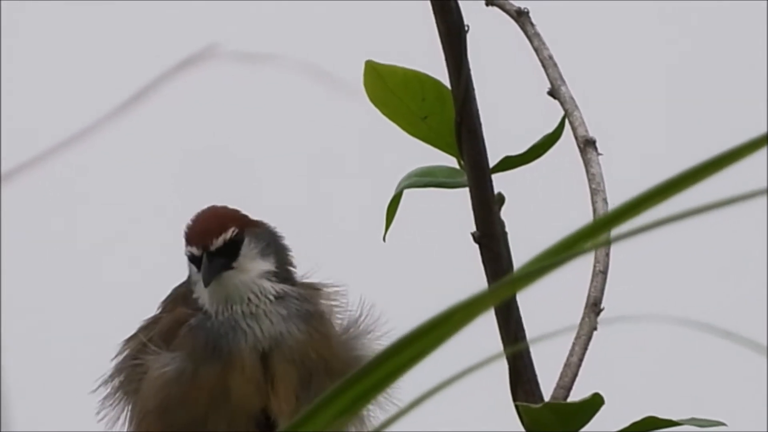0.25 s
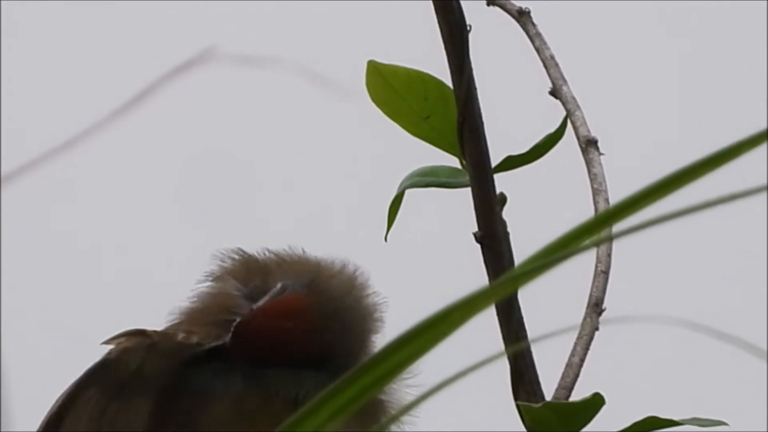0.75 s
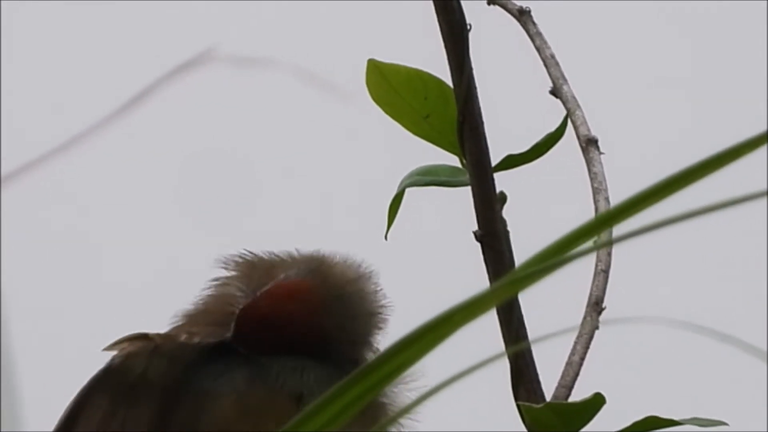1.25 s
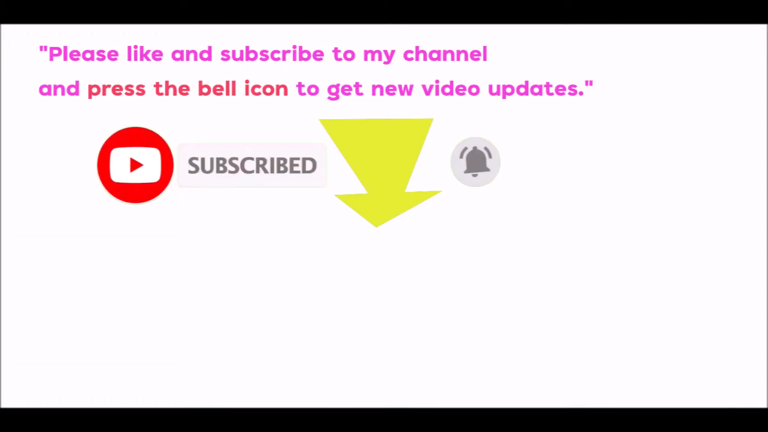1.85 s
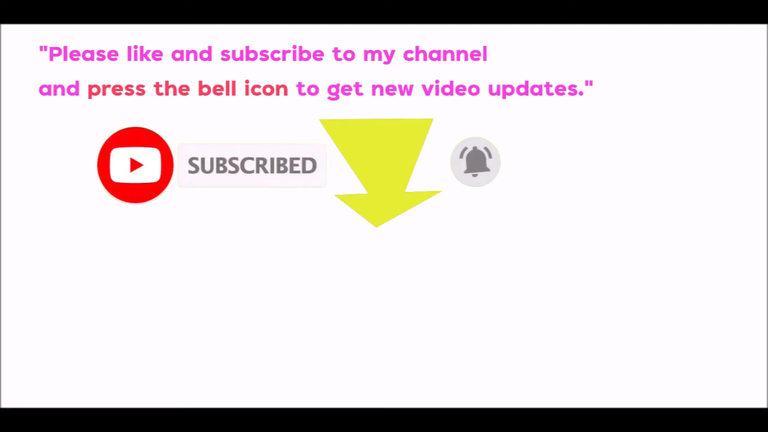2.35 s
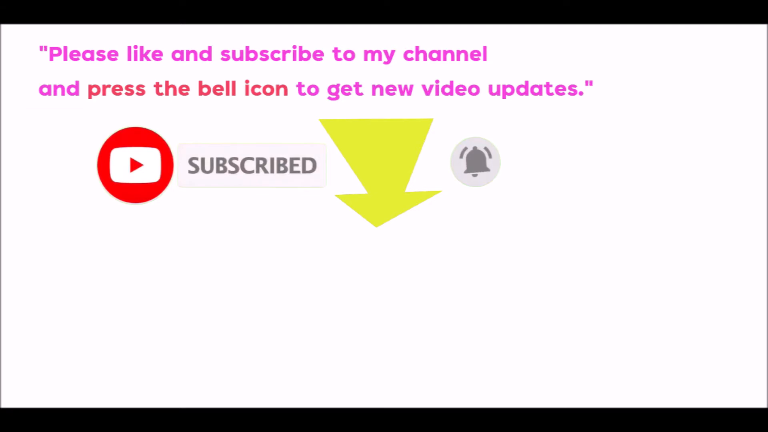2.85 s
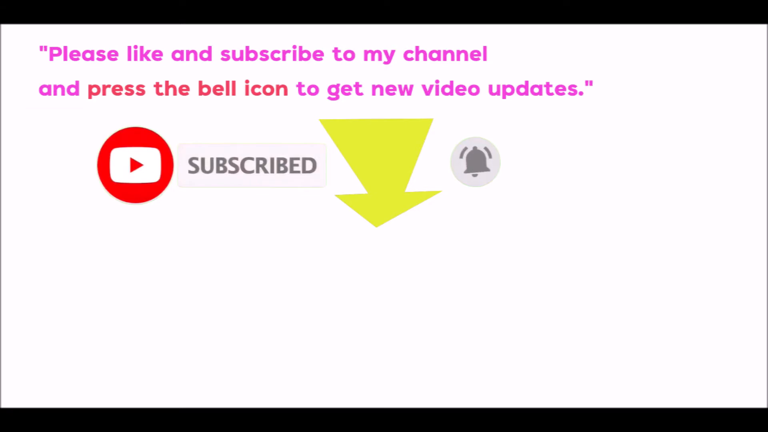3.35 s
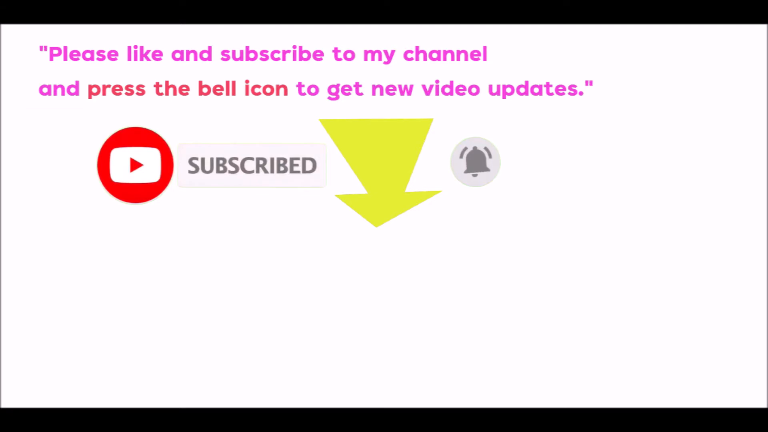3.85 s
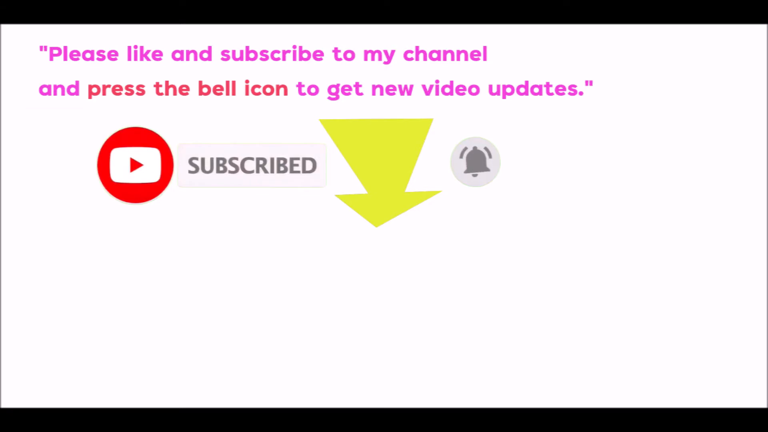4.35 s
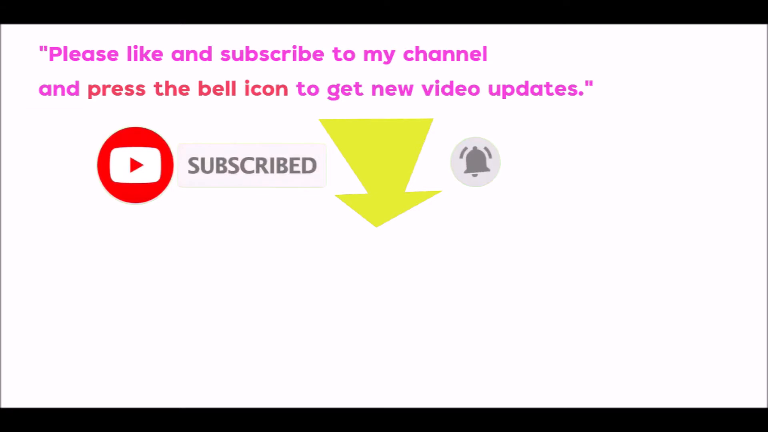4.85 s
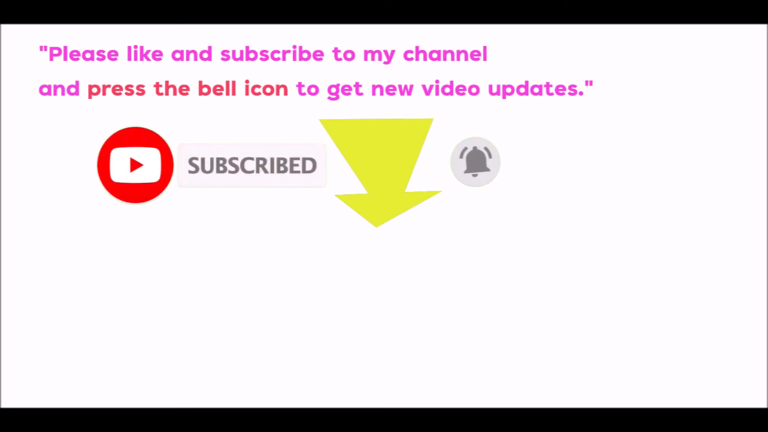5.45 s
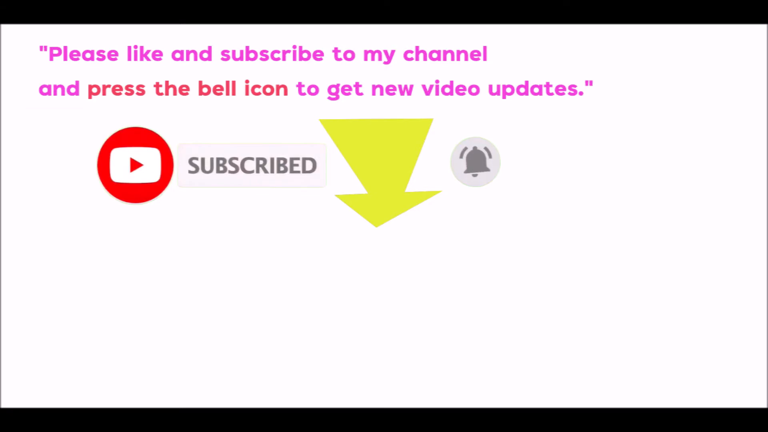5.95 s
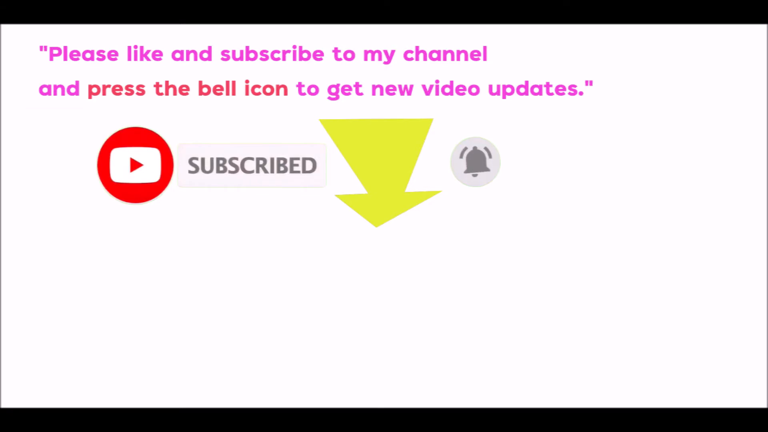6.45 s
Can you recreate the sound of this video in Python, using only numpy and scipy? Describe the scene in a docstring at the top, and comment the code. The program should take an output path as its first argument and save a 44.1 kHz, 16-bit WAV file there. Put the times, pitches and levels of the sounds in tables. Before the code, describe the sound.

Outdoors, steady high insect drone with low hum and thin distant twittering. A split-second shriek with a thin ping cuts the hum and near drone. On the left, a bird amid leaves rasps nasally, rattles off about a dozen harsh notes that slow and fade, then whistles sharply with short scattered echoes. Far calls, pulsing insects and faint low bumps continue; the right holds only hiss.

```python
"""A near insect band and a low hum fill both sides, then stop at a short overloaded zap; hiss stays right.
On the left, insects drone and pulse and far birds twitter throughout: noise bands, thin tones, bent sines.
After the zap a babbler in a thicket, also left, gives a nasal rasp, a fast harsh chatter and sharp whistles.
Rasp and chatter are membrane harmonics and turbulent air shaped by a throat; the whistles are near sines."""
import sys
import numpy as np
from scipy import signal
from scipy.fft import rfft, irfft
from scipy.io import wavfile
from scipy.ndimage import map_coordinates

SR = 44100
rng = np.random.default_rng(int(sys.argv[2]) if len(sys.argv) > 2 else 0)


def int16_out(signal):
    """Quantize to a 16-bit WAV file."""
    q = np.round(np.clip(np.atleast_2d(signal).T, -1, 1) * 32767)
    wavfile.write(sys.argv[1], SR, q.astype(np.int16))


N = 295911
TIME = np.arange(N) / SR
FREQS = np.arange(N // 2 + 1) * SR / N
ZAP_START_S, ZAP_END_S = 1.5173, 1.5317
ZAP_MIDDLE_S = (ZAP_START_S + ZAP_END_S) / 2
CUTOFF_HZ = 16100


def from_db(db):
    """Decibels to gain."""
    return 10 ** (np.asarray(db) / 20)


def rms_one(x):
    """Scale to unit power."""
    return x / np.sqrt(np.mean(x ** 2) + 1e-20)


def in_time(rows, t=TIME):
    """Interpolate each column of a curve at times t; the first column is time."""
    s, *columns = np.transpose(rows)
    return [np.interp(t, s, c) for c in columns]


def add(out, s, sound):
    """Mix a sound into out at time s."""
    start = max(int(s * SR), 0)
    out[start:start + len(sound)] += sound[:max(N - start, 0)]


def noise(spectrum):
    """Steady noise with the given power per Hz, interpolated over log frequency."""
    hz, db = np.transpose(spectrum)
    gain = from_db(np.interp(np.log(FREQS + 1), np.log(hz), db))
    return irfft(rfft(rng.standard_normal(N)) * gain, N) * np.sqrt(SR / 2)


def band(hz, width):
    """Noise in one bell-shaped band, rms 1; width in Hz between the -3 dB points."""
    bell = 2 ** (-2 * ((FREQS - hz) / width) ** 2)
    return rms_one(irfft(rfft(rng.standard_normal(N)) * bell, N))


def wander(rate_hz, size):
    """Random curve around 0: normal draws of spread 1 at rate_hz, joined by lines."""
    knots = np.arange(size) * rate_hz / SR
    return map_coordinates(rng.standard_normal(size), [knots], order=1)


def turn(hz):
    """Phase of an oscillator that follows a pitch."""
    return 2 * np.pi * np.cumsum(hz) / SR


def swell(u, edge):
    """Envelope over u = 0..1 with rounded ends."""
    return np.sin(np.pi / 2 * np.clip(np.minimum(u, 1 - u) / edge, 0, 1)) ** 2


def bout(start_s, end_s, edge_s):
    """Envelope that rises from start, holds and falls to end."""
    return np.sin(np.pi / 2 * np.clip(np.minimum(TIME - start_s, end_s - TIME) / edge_s, 0, 1)) ** 2


def pulse(middle_s, spread_s):
    """Bell-shaped envelope in time, peak 1."""
    return np.exp(-.5 * ((TIME - middle_s) / spread_s) ** 2)


def air():
    """Outdoor rush with a far drone; a faint rumble grows after the zap, with soft bumps."""
    # open-air noise: hz, level_db_per_hz
    air_spectrum = [(20, -102), (40, -89), (70, -81), (200, -78), (600, -75.5), (1150, -74.5),
                    (1600, -80.5), (2400, -83), (3600, -82), (5500, -104), (7000, -92), (10000, -94.5),
                    (13000, -93), (16000, -100)]
    # far steady drone: pitch_hz, rms_db
    drone_tones = [(130, -62.5), (262, -61), (657, -59), (920.5, -75)]
    # soft low bumps: middle_s, level_db
    bump_events = [(2.21, -48), (2.83, -47), (3.58, -43.5), (3.76, -49), (4.52, -45.5), (5.05, -51),
                   (5.32, -53), (5.79, -47)]
    drone = sum(np.sqrt(2) * from_db(db) * np.sin(turn(hz + 2 * wander(14, N))) for hz, db in drone_tones)
    bumps = sum(from_db(db) * pulse(s, 0.023) for s, db in bump_events)
    rumble_db = np.interp(TIME, [ZAP_END_S, 3.5, 5], [-76, -68, -61])
    rumble = from_db(rumble_db) * band(56, width=39)
    return noise(air_spectrum) + drone + rumble + bumps * band(115, width=82)


def hiss():
    """Steady noise for the right side."""
    # hz, level_db_per_hz
    hiss_spectrum = [(20, -120), (100, -110), (400, -97), (1500, -94), (6000, -93), (16000, -94)]
    return noise(hiss_spectrum)


def near_drone(alike=.85, hum_hz=197):
    """Near insect bands, a wavering low hum and a dull wash, on both sides until the zap ends."""
    # insect bands before the side trim: centre_hz, width_hz, level_db
    near_bands = [(4780, 300, -38.9), (4570, 400, -47.5), (6690, 590, -48.5), (4800, 2100, -54)]
    # common gain of the hum parts: time_s, gain_db
    hum_curve = [(0.0, -53), (0.024, -51.5), (0.48, -49.5), (0.942, -59.5), (1.05, -51), (1.448, -53),
                 (1.49, -63)]
    # wash: hz, level_db_per_hz
    wash_spectrum = [(20, -110), (150, -86.5), (400, -93.5), (700, -85.5), (1000, -87), (3500, -94.5),
                     (8000, -98), (16000, -112)]
    common, left, right = [sum(from_db(db) * band(hz, width) for hz, width, db in near_bands)
                           for _ in range(3)]
    # alike: share of power common to both sides
    sides = np.sqrt(alike) * common + np.sqrt(1 - alike) * np.array([left, right])
    sides = sides * (1 + 0.1 * wander(121, N))
    side_trim_db = [[-2], [1]]
    hum = 1.3 * np.sin(turn(hum_hz + 2 * wander(26.0, N)))
    hum += 0.45 * band(202, width=52)
    hum += 0.33 * np.sin(turn(657 + 2 * wander(13.5, N)))
    hum *= from_db(in_time(hum_curve)[0])
    return (sides * from_db(side_trim_db) + hum + noise(wash_spectrum)) * (TIME < ZAP_END_S)


def zap(shriek_hz=4850, drive_db=2, crackle_db=-8, ping_hz=15740, ping_db=1):
    """A very short, crackling shriek that ends in a thin ping; the right side gets only a blip."""
    # decaying ring after the zap: pitch_hz, gain_db
    ring_tones = [(560, -15.5), (780, -18), (3130, -12), (9500, -25)]
    tone = np.sin(turn(shriek_hz * (1 + .07 * wander(2000, N))))
    burst = from_db(drive_db) * tone + from_db(crackle_db) * band(6200, width=1800)
    burst += 0.24 * band(3450, width=510) + 0.41 * band(12600, width=7400)
    gate = (TIME > ZAP_START_S) * (TIME < ZAP_END_S)
    fringe = pulse(ZAP_MIDDLE_S, 0.0066)
    burst *= gate + from_db(-21) * fringe
    age_s = np.clip(TIME - ZAP_END_S - .0007, 0, 1)
    rise = 1 - np.exp(-age_s / 0.00039)
    ping_decay = from_db(ping_db) * np.exp(-age_s / 0.0053) + .22 * np.exp(-age_s / 0.013)
    ping = rise * ping_decay * np.sin(2 * np.pi * ping_hz * TIME)
    ring = sum(from_db(db) * np.sin(2 * np.pi * hz * age_s) for hz, db in ring_tones)
    ring = rise * np.exp(-age_s / 0.0023) * ring
    knock = from_db(-25.5) * pulse(ZAP_MIDDLE_S, 0.0042) * band(610, width=410)
    blip_level = .65 * pulse(ZAP_MIDDLE_S, .0009) + .08 * fringe
    blip = blip_level * (tone + .2 * band(4400, width=3500))
    return np.array([burst + ping + ring + knock, blip])


def whine(hz, waver_hz=18, flicker=0.45):
    """A thin insect tone that trembles in pitch and level."""
    return (1 + flicker * wander(40, N)) * np.sin(turn(hz + waver_hz * wander(200, N)))


def insects(pulse_s=0.03, edge_s=.22, ticks_per_s=128, tick_depth=.55, tick_db=-51, pulse_gap_s=.128):
    """A steady far chorus with fine high ticking, thin whines that come and go, and a high pulsing singer."""
    # far noise bands: centre_hz, width_hz, level_db
    chorus_bands = [(4700, 650, -43), (5900, 890, -46), (7650, 1060, -49), (9110, 630, -53)]
    # unbroken faint tones: pitch_hz, level_db
    steady_tones = [(5479, -59), (5850, -54), (6435, -52.5)]
    # whines, one swell each: start_s, end_s, pitch_hz, level_db
    whine_bouts = [(-.2, 1.0, 5900, -46), (1.1, 1.55, 5870, -50), (1.8, 2.35, 5895, -42.5),
                   (3.9, 4.8, 5810, -48), (4.85, 5.9, 5970, -48.5), (5.7, 6.9, 5800, -48)]
    # even pulses: first_pulse_s, last_pulse_s, centre_hz, first_level_db, last_level_db
    pulse_bouts = [(0, 1.43, 9200, -49, -50), (2.653, 4.08, 9450, -50.5, -44.5),
                   (5.24, 6.62, 9200, -52, -47.5)]
    out = sum(from_db(db) * band(hz, width) for hz, width, db in chorus_bands)
    ticks = 1 + tick_depth * np.cos(turn(ticks_per_s * (1 + .05 * wander(10, N))))
    out += from_db(tick_db) * rms_one(ticks * band(11000, width=950))
    out += sum(from_db(db) * whine(hz) for hz, db in steady_tones)
    out += sum(from_db(db) * bout(start, end, edge_s) * whine(hz) for start, end, hz, db in whine_bouts)
    for first, last, hz, first_db, last_db in pulse_bouts:
        count = round((last - first) / pulse_gap_s) + 1
        pulses = np.linspace((first, first_db), (last, last_db), count)
        out += band(hz, width=580) * sum(from_db(db) * pulse(s, pulse_s) for s, db in pulses)
    return out


def near_sine(pitch, rough, octave_db=-24):
    """A slightly rough tone with a faint octave; rms close to 1."""
    phase = turn(pitch * (1 + rough * wander(1500, len(pitch))))
    return np.sqrt(2) * (np.sin(phase) + from_db(octave_db) * np.sin(2 * phase))


def whistle(length_s, start_hz, middle_hz, end_hz, rough=0.036):
    """A near sine whose pitch follows a parabola through three pitches."""
    u = np.linspace(0, 1, int(length_s * SR))
    bend = np.polyfit([0, .5, 1], [start_hz, middle_hz, end_hz], 2)
    return swell(u, edge=.25) * near_sine(np.polyval(bend, u), rough)


def far_birds(trill_hz=22.27, trill_pitch_hz=4400, trill_swing_hz=190, edge_s=.07):
    """Two-part calls, a flick and an upslur, and bouts of a thin trill that warbles about one pitch."""
    # trill bouts: start_s, end_s, level_db
    twitter_bouts = [(-.1, .75, -43), (1.02, 1.957, -43), (3.3, 3.95, -43.5), (4.178, 4.96, -42),
                     (5.255, 6.16, -43), (6.582, 6.8, -41.5)]
    # two-part calls: start_s, level_db
    calls = [(3.659, -44), (3.852, -42), (4.06, -43), (4.254, -43.5), (4.461, -42.5), (6.071, -47),
             (6.293, -46), (6.487, -45.5)]
    beat = turn(trill_hz * (1 + .2 * wander(25, N)))
    warble_hz = trill_swing_hz * np.sin(2 * beat + wander(18, N))
    pitch = trill_pitch_hz + warble_hz + 100 * wander(500, N)
    level = sum(from_db(db) * bout(start, end, edge_s) for start, end, db in twitter_bouts)
    out = level * rms_one((1 + 1.02 * np.cos(beat)) * np.sin(turn(pitch)))
    for s, db in calls:
        add(out, s, from_db(db) * whistle(0.0146, 4170, 3825, 3000))
        add(out, s + .021, from_db(db) * whistle(0.042, 2580, 3500, 4880))
    return out


def chirps(length_s=.053, rise=0.0596, rough=0.0605):
    """Stray far notes that rise by the same share below and above their middle pitch."""
    # start_s, middle_pitch_hz, level_db
    chirp_notes = [(1.597, 3600, -45), (1.635, 5000, -38.5), (1.84, 2340, -53), (3.803, 5050, -38),
                   (4.1, 4180, -45), (4.22, 4220, -43), (4.306, 5300, -36), (4.68, 3740, -49),
                   (4.79, 5350, -38.5), (4.87, 3570, -48), (5.68, 4780, -39.5), (6.05, 2080, -53),
                   (6.645, 4150, -44)]
    out = np.zeros(N)
    for s, hz, db in chirp_notes:
        add(out, s, from_db(db) * whistle(length_s, hz * (1 - rise), hz, hz * (1 + rise), rough))
    return out


def thicket(x, wet_db, t60, build_s=0.005):
    """Leaves and trunks scatter the sound into a dense, short tail; t60 in s."""
    t = TIME[:SR // 2 + SR // 4]
    scatter = rng.standard_normal(len(t)) * from_db(-60 * t / t60) * (1 - np.exp(-t / build_s))
    scatter /= np.linalg.norm(scatter)
    scatter = signal.sosfilt(signal.butter(2, [2300, 5800], "band", fs=SR, output="sos"), scatter)
    return x + from_db(wet_db) * signal.fftconvolve(x, scatter)[:N]


def twigs(x, echo_db=-13, count=7):
    """A few stems near the bird return quick, distinct echoes."""
    out = x.copy()
    for lag_s in np.linspace(.003, .024, count) * rng.uniform(.85, 1.15, count):
        add(out, lag_s, from_db(echo_db) * rng.choice([-1, 1]) * x)
    return out


def windpipe(x):
    """The pipe favours a few pitches and lets little out below them."""
    # resonances: pitch_hz, width_hz, gain_db
    pipe_modes = [(2880, 230, 0), (3690, 130, -2), (4130, 130, -4), (4780, 200, -4)]
    rings = sum(from_db(db) * signal.lfilter(*signal.iirpeak(hz, hz / width, fs=SR), x + 1e-18)
                for hz, width, db in pipe_modes)
    return signal.sosfilt(signal.butter(4, 1000, "high", fs=SR, output="sos"), 0.83 * (x + rings))


def syrinx(pitch, throat_hz, rough, hiss_db, flutter_hz):
    """Harmonics of a fluttering membrane and turbulent air, both shaped by the throat; rms 1."""
    # response around the throat resonance: offset_hz, gain_db
    throat_response = [(-3000, -24), (-1900, -17), (-1100, -10), (-500, -5), (-3, 0.5), (600, -6.5),
                       (1300, -13.5), (2200, -24.5), (4000, -33), (8014, -42)]
    size = len(pitch)
    offsets, gains_db = np.transpose(throat_response)
    phase = turn(pitch * (1 + rough * wander(flutter_hz, size)))
    orders = np.arange(1, 13)[:, None]
    gains = from_db(np.interp(orders * pitch - throat_hz, offsets, gains_db))
    gains = gains * (orders * pitch < CUTOFF_HZ)
    tone = rms_one((gains * np.sin(orders * phase)).sum(axis=0))
    # complex noise shaped around 0 Hz, then shifted up to the moving resonance
    hz = np.fft.fftfreq(size, 1 / SR)
    shape = from_db(np.interp(hz, offsets, gains_db)) * (hz > offsets[0]) * (hz < offsets[-1])
    breath = np.fft.ifft(np.fft.fft(rng.standard_normal(size)) * shape)
    breath = np.real(breath * np.exp(1j * turn(throat_hz + np.zeros(size))))
    breath *= 1 + 0.17 * np.cos(phase)   # puffs once a cycle
    return rms_one(tone + from_db(hiss_db) * rms_one(breath))


def whistles(chip_foot=.48, chip_rough=0.0996, slur_rough=.045, tail_rough=0.132):
    """The closing notes: chips that arch up from a low foot, and drawn-out slurs."""
    # sharp arched chips: start_s, length_s, top_pitch_hz, level_db
    chip_notes = [(3.51, 0.034, 4450, -21), (3.54, .036, 4200, -27), (3.732, .014, 4900, -23.5),
                  (3.74, .024, 5196, -21), (3.733, .034, 6300, -32.5), (3.762, 0.038, 4880, -30)]
    # thin downslur into the first chip: time_s, pitch_hz, level_db
    downslur = [(3.47, 6650, -42), (3.478, 6620, -33.5), (3.492, 6150, -33), (3.503, 5000, -35.5),
                (3.52, 4200, -34)]
    # low whistle that arches and falls: time_s, pitch_hz, level_db
    low_whistle = [(3.742, 1900, -41), (3.762, 2450, -37), (3.787, 2600, -36), (3.803, 2450, -27),
                   (3.818, 2020, -33), (3.826, 1910, -53)]
    # its hoarse, fading end: time_s, pitch_hz, level_db
    low_tail = [(3.83, 1950, -44), (3.875, 1880, -40.5), (3.965, 1750, -44.5)]
    out = np.zeros(N)
    for s, length_s, top_hz, db in chip_notes:
        foot_hz = chip_foot * top_hz
        add(out, s, from_db(db) * whistle(length_s, foot_hz, top_hz, foot_hz, chip_rough))
    for slur, rough in ((downslur, slur_rough), (low_whistle, slur_rough), (low_tail, tail_rough)):
        t = np.arange(slur[0][0], slur[-1][0], 1 / SR)
        pitch, db = in_time(slur, t)
        add(out, t[0], from_db(db) * near_sine(pitch, rough))
    return out


def harsh_note(length_s, top_hz, throat_hz, foot_hz=950, skew=.5, fundamental_db=-10, sag_db=15,
               closing_hz=150):
    """A note leaps up and slides down again: harsh overtones over a weak fundamental."""
    u = np.linspace(0, 1, int(length_s * SR))
    pitch = foot_hz + (top_hz - foot_hz) * np.sin(np.pi * u ** skew) ** 2
    # the beak closes during the note and the resonance sinks
    sinking_hz = throat_hz + closing_hz * (.5 - u)
    voice = syrinx(pitch, sinking_hz, rough=0.034, hiss_db=-2.5, flutter_hz=1491)
    fundamental = np.sin(turn(pitch * (1 + 0.048 * wander(1310, len(u)))))
    fundamental *= from_db(fundamental_db - sag_db * u)
    # the overtones break in abruptly early in the note
    bite = np.clip((u - .12) / 0.051, 0, 1)
    return swell(u, edge=0.16) * (bite * voice + fundamental)


def chatter(count=11, lead_top_hz=2400, run_top_hz=2646, soft_top_hz=1706):
    """A lead note, a run that slows, fades and draws its notes out, and soft lower notes between."""
    # throat resonance: time_s, resonance_hz
    throat_path = [(2.58, 4150), (2.72, 4074), (3.08, 3410), (3.37, 3620)]
    # soft notes: start_s, length_s, throat_resonance_hz, level_db
    soft_notes = [(2.599, 0.052, 4370, -21), (3.005, 0.028, 3250, -26), (3.069, 0.027, 3000, -30),
                  (3.137, .019, 3230, -28), (3.199, .028, 3400, -24.5), (3.322, 0.038, 3910, -24),
                  (3.402, 0.026, 3550, -33)]
    lead_s, lead_length_s, lead_db = 2.578, .04, -15
    run_start_s, run_gap_s, gap_growth_s = 2.7215, .0595, .001
    note_length_s, length_growth_s = .029, .001
    run_db, fade_db_per_note = -16, 0.42
    out = np.zeros(N)
    lead = harsh_note(lead_length_s, lead_top_hz, in_time(throat_path, lead_s)[0])
    add(out, lead_s, from_db(lead_db) * lead)
    s = run_start_s
    for k in range(count):
        note = harsh_note(note_length_s + k * length_growth_s, run_top_hz, in_time(throat_path, s)[0])
        add(out, s, from_db(run_db - k * fade_db_per_note) * note)
        s += run_gap_s + k * gap_growth_s
    for s, length_s, throat_hz, db in soft_notes:
        add(out, s, from_db(db) * harsh_note(length_s, soft_top_hz, throat_hz, fundamental_db=-18))
    return out


def rasp(shake_hz=66, shake=0.066, low_cut_hz=1650):
    """A nasal buzz whose pitch shakes; higher and airier as the throat opens, thin in its low harmonics."""
    # as the beak opens and closes: time_s, throat_resonance_hz, level_db
    rasp_path = [(2.34, 2795, -37), (2.362, 3200, -26), (2.40, 3450, -20.5), (2.435, 3550, -20),
                 (2.455, 3247, -16), (2.504, 2750, -14.5), (2.522, 2696, -18.5), (2.531, 2850, -38)]
    # pitch and air noise at the rest resonance; both rise with the resonance
    rest_throat_hz, rest_pitch_hz, rest_air_db = 2800, 705, -5.5
    pitch_per_throat, air_db_per_throat_hz = .075, .008
    out, t = np.zeros(N), np.arange(rasp_path[0][0], rasp_path[-1][0], 1 / SR)
    throat_hz, db = in_time(rasp_path, t)
    opening_hz = throat_hz - rest_throat_hz
    pitch = rest_pitch_hz + pitch_per_throat * opening_hz
    hiss_db = rest_air_db + air_db_per_throat_hz * opening_hz
    wobble = np.sin(turn(shake_hz * (1 + 0.148 * wander(45.7, len(t)))))
    voice = syrinx(pitch * (1 + shake * wobble), throat_hz, rough=.04, hiss_db=hiss_db, flutter_hz=1100)
    add(out, t[0], from_db(db + 0.59 * wobble) * voice)
    return signal.sosfilt(signal.butter(2, low_cut_hz, "high", fs=SR, output="sos"), out)


def scene():
    """Birds, far insects and air on the left, hiss on the right, the near drone and the zap on both."""
    babbler = thicket(windpipe(rasp()), wet_db=-4.5, t60=0.19)
    babbler += thicket(twigs(windpipe(chatter()), echo_db=-14), wet_db=-5.5, t60=0.34)
    babbler += thicket(twigs(whistles(), echo_db=-14.5), wet_db=-6, t60=0.69)
    others = thicket(far_birds(), wet_db=-2.5, t60=0.3) + thicket(chirps(), wet_db=-1.5, t60=0.45)
    left = babbler + others + insects() + air()
    return np.array([left, hiss()]) + near_drone() + zap()


def record(dry):
    """Overload flattens the peaks; a steep low-pass cuts the top."""
    low_pass = signal.ellip(12, .1, 80, CUTOFF_HZ, fs=SR, output="sos")
    return signal.sosfilt(low_pass, np.clip(dry, -1, 1))


dry = scene()
out = record(dry)
int16_out(out)
```